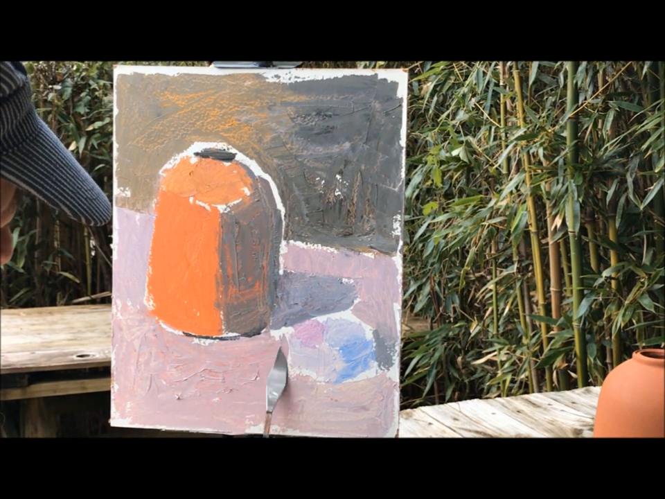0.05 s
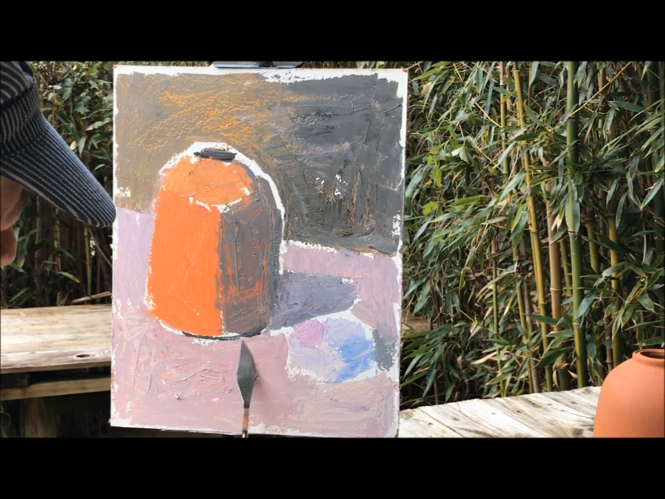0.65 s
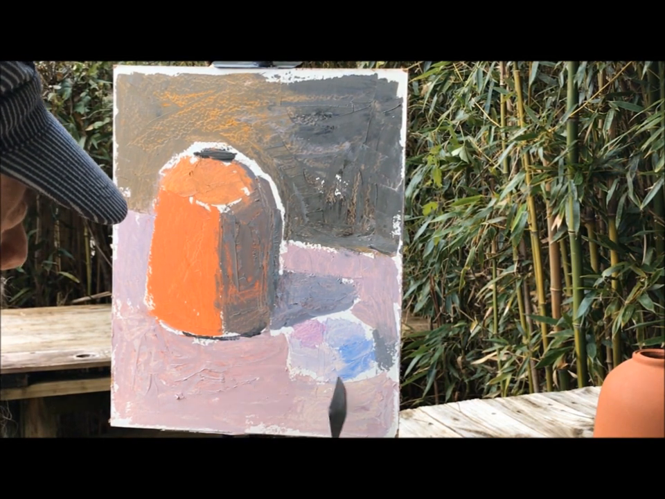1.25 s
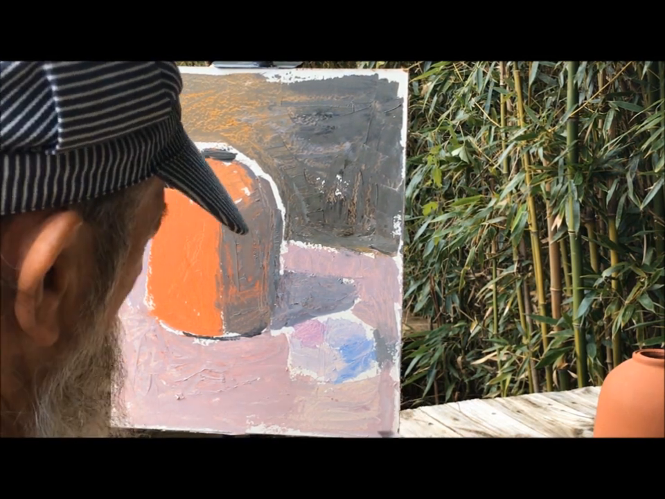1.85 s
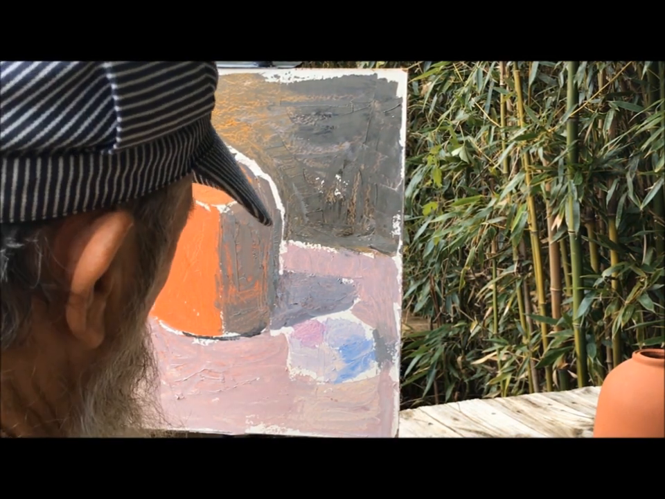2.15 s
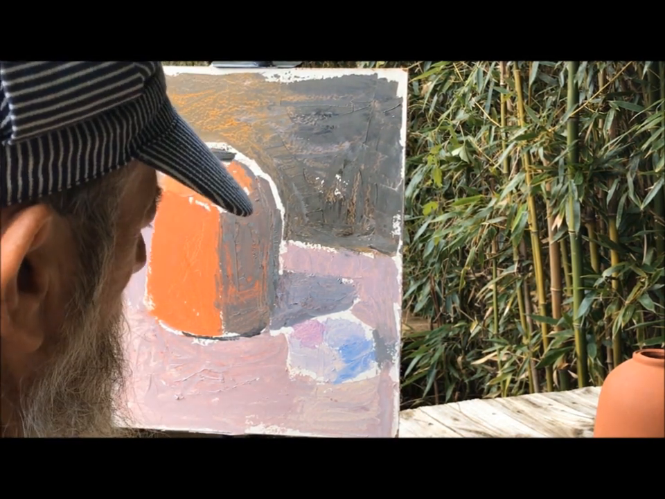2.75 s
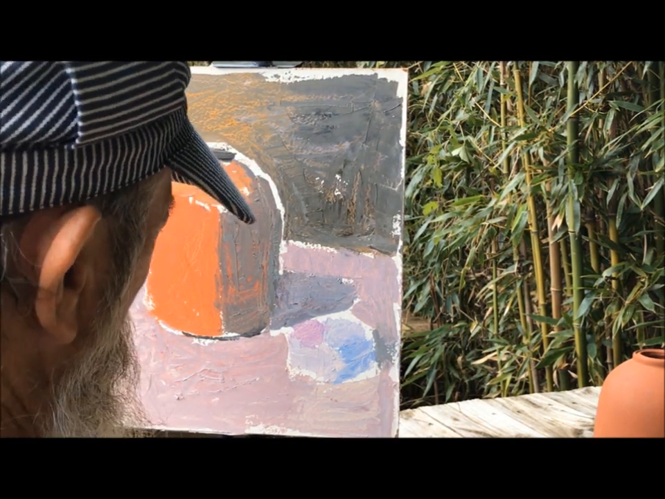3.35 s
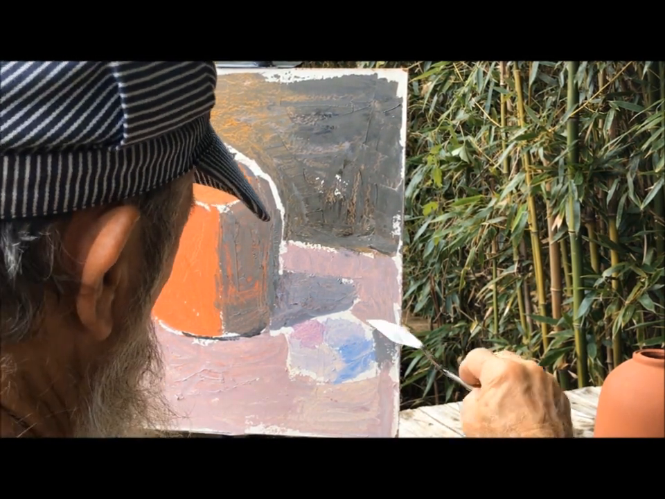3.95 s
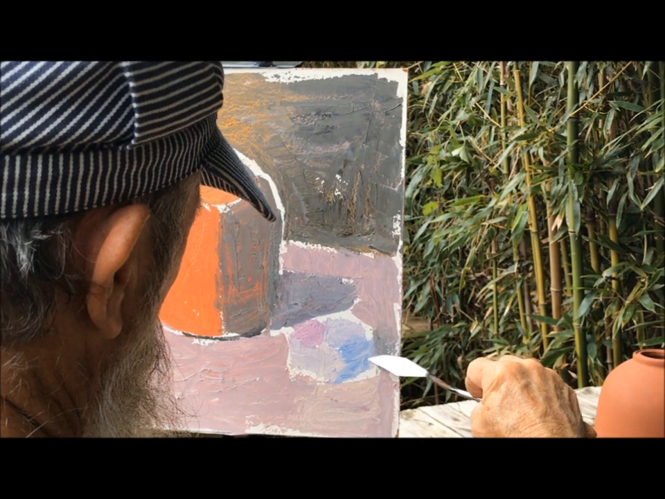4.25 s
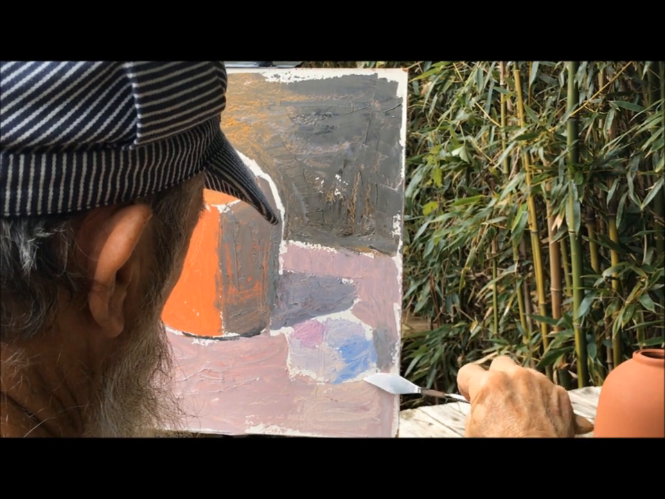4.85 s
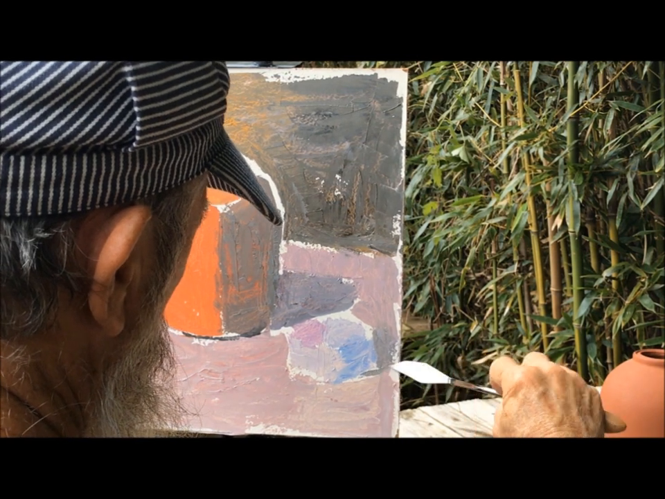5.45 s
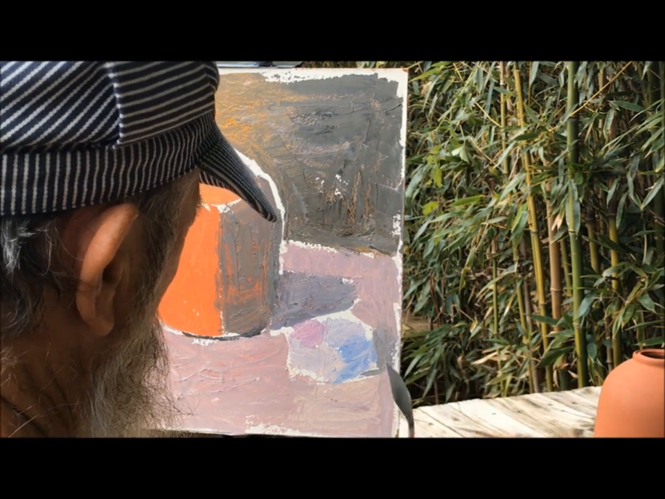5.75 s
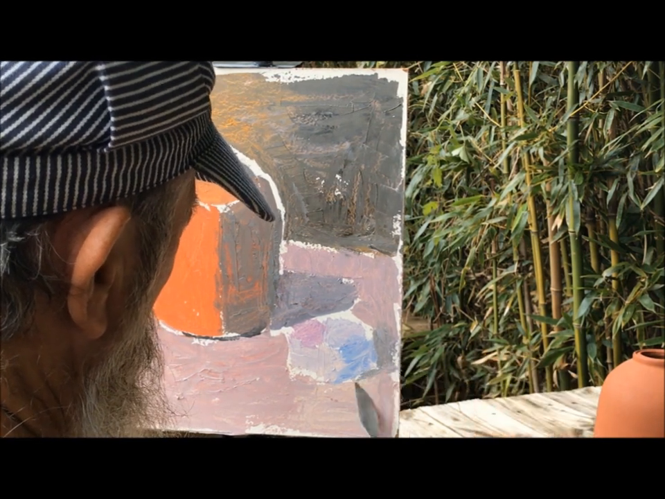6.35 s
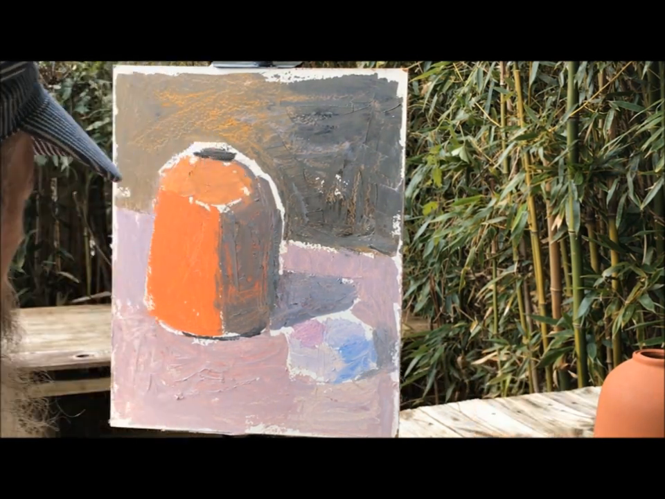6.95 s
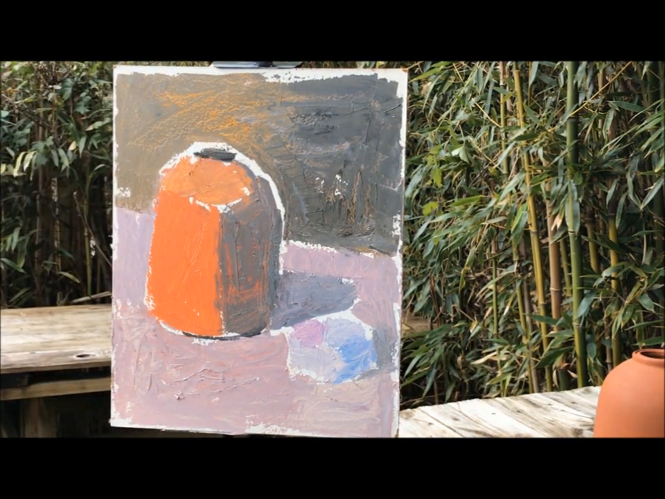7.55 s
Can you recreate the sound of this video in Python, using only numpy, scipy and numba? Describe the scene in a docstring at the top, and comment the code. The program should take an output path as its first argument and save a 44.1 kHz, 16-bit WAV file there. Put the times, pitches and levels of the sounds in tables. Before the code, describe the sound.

A palette knife scrapes and dabs on canvas and knocks once, while a bird repeats quick rising whistles over a low engine drone.

```python
"""Garden air, a thin hiss and a distant engine's low, steady drone sound throughout; the drone's level
flickers, more deeply toward the end. From 0.3 s a palette knife scrapes and dabs paint on canvas;
stick-slip rings the steel blade, higher the more firmly it is pressed. At 2.07 s the knife knocks hard
on the wooden frame. From 3.4 s a bird in the foliage whistles a quick rising phrase seven times, the
last cut short. The strokes resume at 4.2 s and end faintly at 7.4 s."""
import sys
import numpy as np
from scipy import signal
from scipy.fft import rfft, irfft
from scipy.io import wavfile
from scipy.ndimage import uniform_filter1d
from numba import njit

SR = 44100
rng = np.random.default_rng(int(sys.argv[2]) if len(sys.argv) > 2 else 0)


def wrap_up_sound(samples):
    """Save the sound to the file named by the first command line argument, as 16-bit audio."""
    columns = np.atleast_2d(samples).T
    # keep every value between -1 and 1, then stretch to whole-number steps
    tamed = np.clip(columns, -1, 1)
    steps = np.round(tamed * 32767).astype(np.int16)
    wavfile.write(sys.argv[1], SR, steps)


N = 335601
TIME = np.arange(N) / SR


def amp(db):
    """Decibels to gain."""
    return 10 ** (np.asarray(db) / 20)


def unit(x):
    """Scale to rms 1."""
    return x / np.sqrt(np.mean(x ** 2) + 1e-20)


def add(mix, at_s, sound):
    """Mix a sound in at a given time."""
    part = mix[max(round(at_s * SR), 0):][:len(sound)]
    part += sound[:len(part)]


def colour(x, spectrum, tilt_db_per_oct=0):
    """Filter by a spectrum, tilted above 2 kHz; rms 1."""
    octave = np.log2(np.fft.rfftfreq(len(x), 1 / SR) + 1)
    hz, db = np.transpose(spectrum)
    tilt_db = tilt_db_per_oct * np.maximum(octave - 13, -2)
    return unit(irfft(rfft(x) * amp(np.interp(octave, np.log2(hz), db) + tilt_db), len(x)))


def drift(rate_hz):
    """Slow random wander; rms 1."""
    hz = np.fft.rfftfreq(N, 1 / SR)
    return unit(irfft(rfft(rng.standard_normal(N)) * np.exp(-(hz / rate_hz) ** 2), N))


# outdoor air: f/Hz, relative density/dB
AIR_SPECTRUM = [(20, -24), (40, -3.5), (54, 6), (70, 1.5), (90, 1), (130, -2.5), (200, -8), (300, -13),
                (450, -16.5), (800, -15.5), (1200, -18), (2000, -23.5), (4000, -27.5), (8500, -31),
                (11500, -35.5), (16000, -35.5)]

def air(level_db=-59, swell_db=0.44):
    """Outdoor air: a soft, gently swelling wash."""
    return amp(level_db + swell_db * drift(3.6)) * colour(rng.standard_normal(N), AIR_SPECTRUM)


def hiss(level_db=-75.5, centre_hz=9654, sigma_hz=410):
    """Steady narrow band of high noise."""
    band = np.exp(-0.5 * ((np.fft.rfftfreq(N, 1 / SR) - centre_hz) / sigma_hz) ** 2)
    return amp(level_db) * unit(irfft(rfft(rng.standard_normal(N)) * band, N))


# firing rate: t/s, f/Hz
FIRING_RATE = [(0, 67.7), (1.2, 68.23), (3.5, 67.46), (7.6, 67.49)]
# drone as the air carries it: t/s, level/dB
DRONE_LEVEL = [(0.0, -52.5), (0.3, -47), (0.8, -50), (1.2, -48), (1.5, -51.5), (1.8, -47.5), (2.1, -52),
               (2.4, -46.5), (2.6, -52.5), (2.9, -47.5), (3.3, -51), (4.0, -48.5), (4.8, -51), (5.0, -54),
               (5.3, -50.5), (7.6, -50.5)]
# harmonics: order, initial gain/dB, slope/(dB/s)
DRONE_HARMONICS = [(1, -1, 0), (2, -14, -1.37), (3, -23, -0.57), (6, -34, 0)]

def engine(waver_db=3, flicker_hz=8, flicker_db=1.2, flicker_db_per_s=0.15):
    """Low, steady drone at the firing rate; the level heard flickers, more deeply toward the end."""
    cycles = np.cumsum(np.interp(TIME, *np.transpose(FIRING_RATE))) / SR
    tone = np.zeros(N)
    for order, db, db_per_s in DRONE_HARMONICS:
        gain = amp(db + db_per_s * TIME + waver_db * (order > 1) * drift(2.9))
        tone += gain * np.sin(2 * np.pi * order * cycles)
    flicker = np.tanh(unit(np.gradient(drift(flicker_hz))))
    depth_db = flicker_db + flicker_db_per_s * TIME
    level_db = np.interp(TIME, *np.transpose(DRONE_LEVEL))
    return np.sqrt(2) * amp(level_db + depth_db * flicker) * tone


# shank and handle resonances: f/Hz, width/Hz, relative level/dB
KNIFE_RESONANCES = [(1350, 110, -5), (2150, 190, -2), (2770, 130, 0), (3080, 220, -3), (3950, 350, -6),
                    (4620, 130, 3), (5330, 350, -5), (5950, 280, -2), (6530, 230, 3), (8130, 220, 1),
                    (8660, 200, 5), (9600, 600, -9), (11200, 330, 3), (12350, 260, -7), (13700, 300, -4),
                    (14400, 450, -6), (15400, 500, -14)]

def knife_body(x, tilt_db_per_oct, stiffen=1):
    """Filter by shank and handle, pitch scaled by stiffen, tilted above 2 kHz; rms 1."""
    f = np.fft.rfftfreq(len(x), 1 / SR)
    power = sum(amp(2 * db) / (1 + 2 * ((f - hz * stiffen) / width_hz) ** 2) ** 2
                for hz, width_hz, db in KNIFE_RESONANCES)
    tilt = amp(tilt_db_per_oct * np.log2(np.maximum(f, 2000)))
    return unit(irfft(rfft(x) * np.sqrt(power) * tilt, len(x)))


# rubbed stretched canvas: f/Hz, relative density/dB
CANVAS_SPECTRUM = [(200, -2), (400, -5.5), (500, -7), (620, -1.5), (800, -6), (1050, -2.5), (1600, -8.5),
                   (2500, -4.5), (6000, -18.5)]
# strokes: start/s, end/s, scrape level/dB, tilt/(dB/oct),
# singing-mode push/dB re scrape, other-mode push/dB re scrape, canvas level/dB
KNIFE_STROKES = [(.332, 0.37, -70, 1, -11, -9, -66), (0.391, .415, -73, 0, -12, -10, -69),
                 (0.783, 0.894, -73, -1, -16, -15, -59.5), (0.902, 0.977, -53.5, 0, 8, 3, -68),
                 (1.026, 1.073, -67, -6, -18, -10, -68), (1.09, 1.166, -57, -1.5, -3.5, -13, -64),
                 (1.221, 1.277, -65, -6, -12, -6, -65.5), (1.28, 1.304, -55, 0.5, -11, -12, -78),
                 (1.75, 1.86, -70, -7.5, -8, -11, -74), (1.948, 2.01, -74, -14, -13, -5, -73),
                 (4.235, 4.394, -67.5, -6.5, -8, -1, -63.5), (4.443, 4.49, -65, -3.5, 4.5, 9, -68),
                 (4.528, 4.556, -66.5, 2, 5, 5, -69), (4.593, 4.707, -64.5, -8, -13, -3, -64.5),
                 (4.729, 4.762, -69, -1, 3, 11, -65.5), (5.132, 5.28, -91, 5, 7, 9, -77),
                 (5.39, 5.613, -86, 7, -3, -1, -78), (6.147, 6.225, -69, -5.5, -15, -8, -62.5),
                 (6.238, 6.31, -55, -2.5, 5.5, 5, -69), (6.319, 6.405, -70, -3, -3, 3, -60.5),
                 (6.416, 6.49, -52, 0.5, -9, -0.5, -67), (6.492, 6.567, -63.5, 0, -13, -1, -64.5),
                 (6.58, 6.633, -51, 1.5, 4.5, 1, -64.5), (7.254, 7.43, -100, 4, -10, -10, -72.5)]

def friction(rise_hz, grains_per_s=900, ridge_db=2.2, touch_s=0.0088, stiffen_per_khz=0.0059):
    """The knife bites and drags over paint ridges, rubbing the canvas and pushing the blade's modes."""
    grains = unit(rng.standard_normal(N) * (rng.random(N) < grains_per_s / SR))
    grit = unit((rng.standard_normal(N) + 0.45 * grains) * amp(ridge_db * drift(75)))
    scrape, sing_push, other_push = np.zeros((3, N))
    for start, end, db, tilt, sing_db, other_db, canvas_db in KNIFE_STROKES:
        span = (TIME > start) & (TIME < end)
        t = TIME[span] - start
        swell = np.interp(t / (end - start), [0, 0.44, 1], [0.37, 1, 0]) ** 0.69
        pressure = unit(swell * np.minimum(t / touch_s, 1))
        stiffen = 1 + stiffen_per_khz * rise_hz[span].mean() / 1000
        steel = amp(db) * knife_body(grit[span], tilt, stiffen)
        canvas = amp(canvas_db) * colour(grit[span], CANVAS_SPECTRUM)
        scrape[span] += pressure * (steel + canvas)
        sing_push[span] += amp(db + sing_db) * unit(np.sqrt(pressure * t))  # peaks as the blade eases off
        other_push[span] += amp(db + other_db) * pressure
    return scrape, grit, sing_push, other_push


@njit
def ring(drive, pole):
    """One mode with per-sample pitch and damping."""
    out, state = np.zeros(len(drive)), 0j
    for i in range(len(drive)):
        state = state * pole[i] + drive[i]
        out[i] = state.imag
    return out


# bending modes, singing mode first: free f/Hz, share of rise, gain/dB, widening/(Hz per Hz of rise)
BLADE_MODES = [(7626, 0.96, 0, 0.035), (10630, .8, 0, 0.028), (13900, .7, -14, .08), (4620, .6, -5, .12)]
# the same modes, blade free: width/Hz
FREE_WIDTHS_HZ = (6.5, 45, 55, 50)

def blade(rise_hz, grit, sing_push, other_push, blow, coupling_db=-25, rasp=0.5, squeal=0.04):
    """Contact grips, stiffens and damps the blade; struck or released, its singing mode rings on."""
    grip = 0.29 + rise_hz / 700
    out = np.zeros(N)
    for k, ((hz, share, db, widening), free_width_hz) in enumerate(zip(BLADE_MODES, FREE_WIDTHS_HZ)):
        push, jolt = (other_push, 0) if k else (sing_push, blow)
        step_rad = 2 * np.pi * (hz + share * rise_hz) / SR
        stick_slip = rasp * grit + squeal * np.exp(1j * np.cumsum(step_rad))  # partly locked to the mode
        drive = amp(coupling_db) * grip * push * stick_slip + jolt
        width_hz = free_width_hz + widening * abs(rise_hz)
        out += amp(db) * ring(drive, np.exp(1j * step_rad - np.pi * width_hz / SR))
    return out


def garden_echo(x, leaves_db, leaves_t60_s, trees_db, trees_t60_s, echoes_per_s=2000):
    """Leaves and stems scatter a quick cloud of echoes; the trees behind add a longer one."""
    t = np.arange(SR) / SR
    taps = rng.standard_normal((2, SR)) * (rng.random((2, SR)) < echoes_per_s / SR) * (t > 0.005)
    tails = taps * amp(-60 * t / np.array([[leaves_t60_s], [trees_t60_s]]))
    tails /= np.linalg.norm(tails, axis=1, keepdims=True)
    return signal.fftconvolve(x, amp([leaves_db, trees_db]) @ tails)[:N]


# blade bends: start/s, end/s, peak rise/Hz
BENDS = [(.735, 0.943, 2424), (.942, 1.083, 2500), (1.02, 1.166, 2400), (1.12, 1.288, 2500),
         (1.7, 2.02, 299.8), (2.04, 2.119, 905), (4.2, 4.47, 2200), (4.545, 4.752, 2520),
         (5.05, 5.75, 2350), (6.05, 6.248, 2000), (6.272, 6.485, 2232), (6.487, 6.616, 2495)]

def flex():
    """The hand bends and relaxes the blade: arches of pitch rise in Hz, each mode taking a share."""
    return sum(hz * np.sin(np.pi * np.clip((TIME - start) / (end - start), 0, 1)) ** 2
               for start, end, hz in BENDS)


# tip on canvas: t/s, level/dB
TIP_TOUCHES = [(1.0295, -47.5), (1.2295, -46), (1.2958, -41), (1.886, -53), (4.214, -53), (4.537, -48),
               (4.745, -50)]

def ticks(t60_s=0.0093):
    """Brief touches of the tip jolt the knife's resonances."""
    t = np.arange(SR // 20) / SR
    out = np.zeros(N)
    for at_s, db in TIP_TOUCHES:
        tick = knife_body(rng.standard_normal(len(t)), tilt_db_per_oct=-3.5)
        add(out, at_s, tick * amp(db - 60 * t / t60_s))
    return out


# hit and bounces: t/s, relative level/dB
IMPACTS = [(2.0705, 0.5), (2.0727, 4), (2.0745, -5), (2.0763, -10), (2.079, -9)]
# steel on the edge: f/Hz, relative density/dB
CRACK_SPECTRUM = [(100, -35.5), (400, -19.5), (650, 3.5), (980, -8), (1500, -7.5), (3500, -17.5),
                  (5500, -27.5), (7200, -4), (8500, -4), (11500, 3.5), (13300, -3), (14500, -24),
                  (16000, -23)]
# wooden frame and fittings: f/Hz, relative level/dB, t60/s
FRAME_MODES = [(175.7, -15.5, 0.25), (229, -16, 0.039), (257, -6.5, 0.14), (292, -5, 0.15),
               (493, -6.5, 0.066), (598, 0.5, 0.024), (678, -13.5, .09), (750, -18.5, 0.092),
               (1322, -12, 0.046), (1660, -12.5, 0.051), (2066, -22, 0.086), (2540, -12.5, 0.078),
               (4315, 1, 0.016), (4720, -27.5, 0.16), (6360, -7, 0.059), (6490, -8, 0.024),
               (8197, -3, 0.085), (8740, -9, 0.09), (9440, -9, 0.09), (11040, -11, 0.052),
               (12150, -15.5, 0.035), (12600, -22, 0.029)]

def knock(crack_db=-22.5, crack_t60_s=0.0051, rattle_db=-30, rattle_t60_s=0.044,
          frame_db=-27, attack_s=0.0034, blow_db=-38, release_s=2.106, release_db=-44):
    """The knife hits the frame, chatters and springs free; returns sound and force on the blade."""
    t = np.arange(SR // 2) / SR
    hit_s = IMPACTS[0][0]
    sound, force = np.zeros((2, N))
    for at_s, db in IMPACTS:
        crack = colour(rng.standard_normal(len(t)), CRACK_SPECTRUM)
        add(sound, at_s, crack * amp(crack_db + db - 60 * t / crack_t60_s))
    rattle = knife_body(rng.standard_normal(len(t)), tilt_db_per_oct=4.5)
    rattle *= amp(rattle_db - 60 * t / rattle_t60_s)
    frame = sum(amp(db - 60 * t / t60_s) * np.sin(2 * np.pi * hz * t) for hz, db, t60_s in FRAME_MODES)
    add(sound, hit_s, (rattle + amp(frame_db) * frame) * (1 - np.exp(-t / attack_s)))
    add(force, hit_s, amp([blow_db]))
    add(force, release_s, amp([release_db]))  # leaving the edge plucks the blade
    return sound, force


# phrases: t/s, relative level/dB, pitch factor, note-onset limit/s re t
BIRD_PHRASES = [(3.515, 5, 1.0, .1), (3.731, 6.5, 1, .1), (3.947, 8.5, 0.99, .1), (4.159, 9, 0.99, .1),
                (4.373, 9.5, 0.99, .1), (4.586, 8, 1, .05), (4.799, 8.5, 0.97, -.035)]
# notes: onset/s re phrase t, length/s, nominal start f/Hz, nominal end f/Hz, relative level/dB, rasp 0-1
BIRD_NOTES = [(-.114, 0.0266, 2205, 2320, -10.5, 0), (-.097, 0.03, 2378, 2690, -10.5, 0.26),
              (-.072, 0.01644, 3100, 2657, -7, .25), (-.051, 0.0096, 2750, 2560, -13, 0),
              (-.027, 0.017, 2500, 2580, -22, 0.2), (-.004, .022, 2794, 3544, -1.5, 0.11),
              (0.012, 0.052, 3330, 3428, -11.5, 0.16), (.054, .032, 4200, 3850, -13, .9),
              (.059, 0.01, 3350, 3217, -7.5, 0.84)]

def bird(level_db=-48.5, flutter_db=2, waver=0.011, rasp_depth=0.129):
    """A whistle repeats the same gliding notes; full phrases break into a raspy chip at the end."""
    song, slow, fast = np.zeros(N), drift(130), drift(620)
    for at_s, phrase_db, factor, limit_s in BIRD_PHRASES:
        for onset_s, length_s, start_hz, end_hz, db, rasp in BIRD_NOTES:
            if onset_s < limit_s:
                progress = np.linspace(0, 1, round(length_s * SR), endpoint=False)
                span = round((at_s + onset_s) * SR) + np.arange(len(progress))
                glide_hz = end_hz + (start_hz - end_hz) * (1 - progress) ** 1.33
                pitch_hz = factor * glide_hz * (1 + waver * slow[span] + rasp_depth * rasp * fast[span])
                arch = amp(phrase_db + db) * np.sin(np.pi * progress) ** 0.57
                add(song, at_s + onset_s, arch * np.sin(2 * np.pi * np.cumsum(pitch_hz) / SR))
    return amp(level_db + flutter_db * drift(55)) * song


def scene():
    """Knife close by, bird and engine far off; mono."""
    rise_hz = flex()
    scrape, grit, sing_push, other_push = friction(rise_hz)
    hit, blow = knock()
    knife = scrape + ticks() + hit + blade(rise_hz, grit, sing_push, other_push, blow)
    knife_echo = garden_echo(knife, leaves_db=-12.5, leaves_t60_s=0.086, trees_db=-33, trees_t60_s=0.96)
    song = bird()
    song_echo = garden_echo(song, leaves_db=-8.5, leaves_t60_s=0.14, trees_db=-6.5, trees_t60_s=0.97)
    return (knife + knife_echo + amp(-4) * song + song_echo + engine() + air() + hiss())[None]


def record(dry, open_db=-27, hold_s=0.402, lift_db=6, corner_hz=1200, cutoff_hz=15800):
    """A noise suppressor opens on a loud peak and holds briefly, lifting the treble; then a low-pass."""
    loud = abs(dry[0]) > amp(open_db)
    since_loud_s = TIME - np.maximum.accumulate(np.where(loud, TIME, -np.inf))
    opened = uniform_filter1d((since_loud_s < hold_s) * 1.0, size=200)
    treble = signal.sosfilt(signal.butter(1, corner_hz, "high", fs=SR, output="sos"), dry)
    lifted = dry + (amp(lift_db) - 1) * opened * treble
    lowpass = signal.firwin(401, cutoff_hz, window=("kaiser", 8), fs=SR)
    return signal.oaconvolve(lifted, lowpass[None], "same")


dry = scene()
out = record(dry)
wrap_up_sound(out)
```